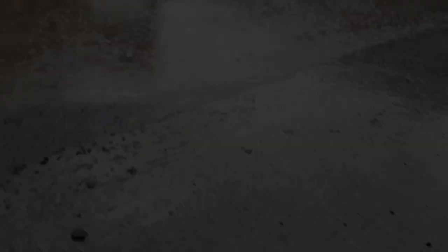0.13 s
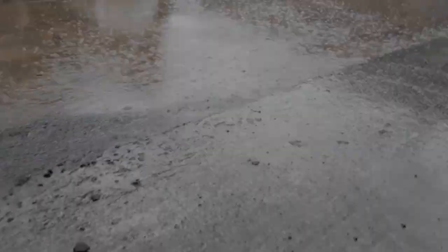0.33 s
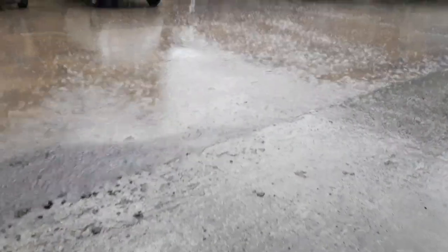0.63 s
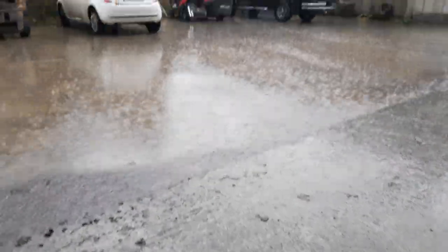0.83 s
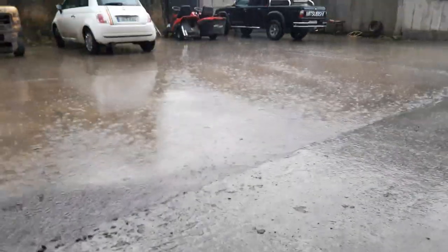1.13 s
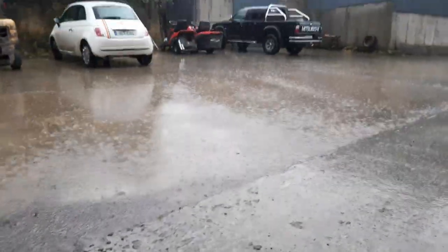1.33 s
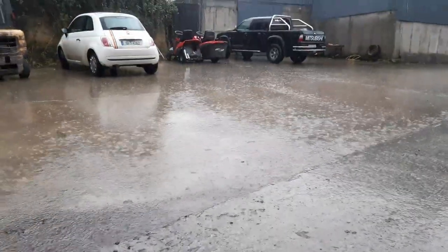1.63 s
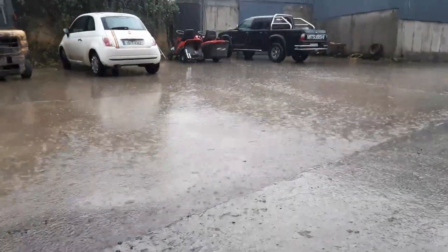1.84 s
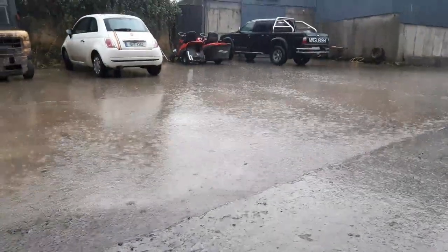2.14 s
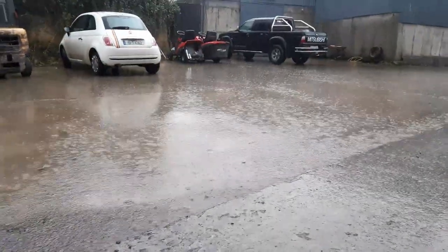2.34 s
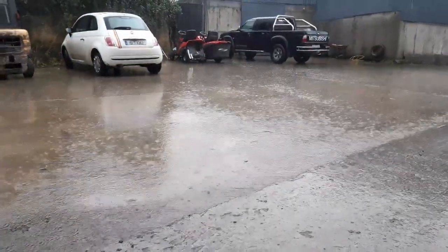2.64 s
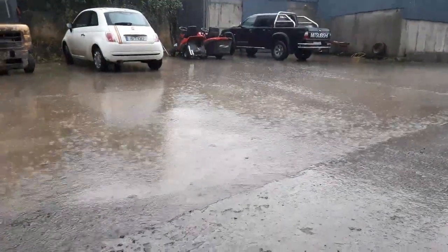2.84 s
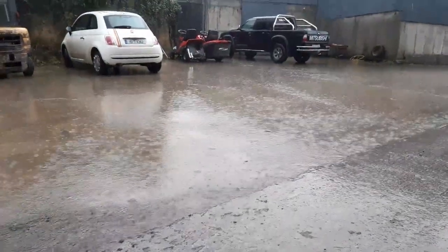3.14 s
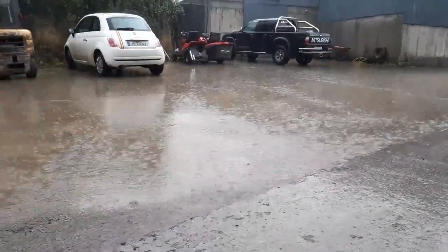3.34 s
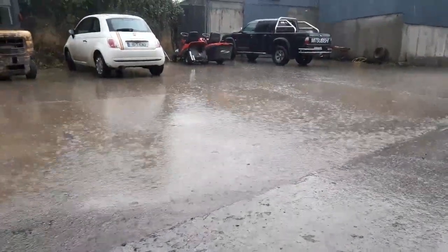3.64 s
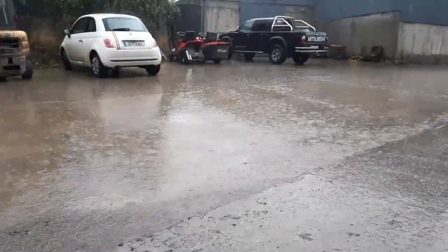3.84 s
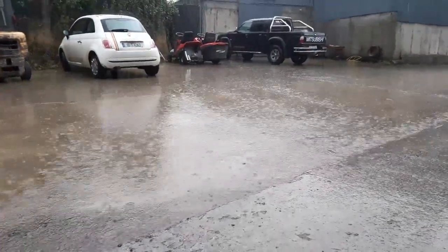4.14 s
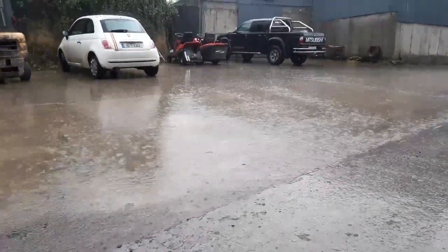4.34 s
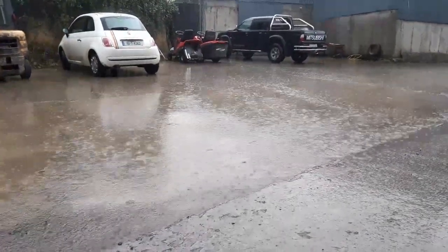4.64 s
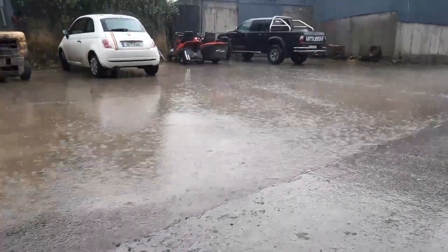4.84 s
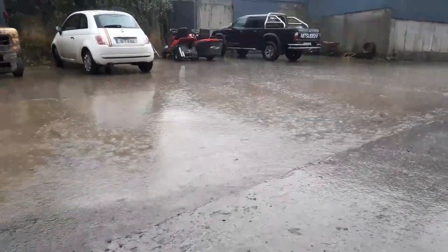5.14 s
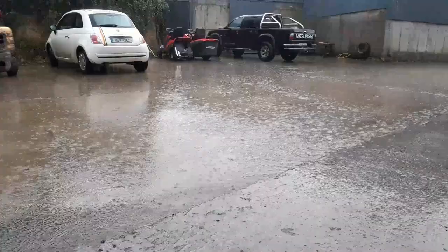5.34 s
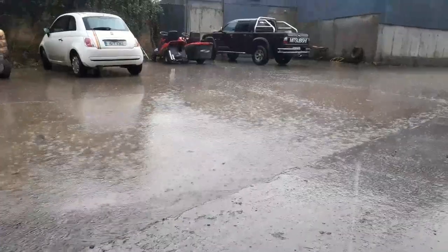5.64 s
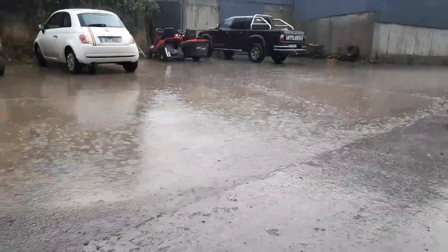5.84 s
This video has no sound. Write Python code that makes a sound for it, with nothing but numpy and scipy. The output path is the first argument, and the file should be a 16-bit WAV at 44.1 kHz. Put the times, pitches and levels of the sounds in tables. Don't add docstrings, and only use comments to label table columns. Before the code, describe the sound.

Steady rain hisses and patters on a puddled concrete yard, with sharp close drop cracks, the loudest just before the fade-out.

```python
import sys
import numpy as np
from scipy import signal
from scipy.fft import rfft, irfft
from scipy.io import wavfile
from scipy.ndimage import uniform_filter1d

SR = 44100
rng = np.random.default_rng(int(sys.argv[2]) if len(sys.argv) > 2 else 0)


def volts_from_db(level):
    exponent = np.asarray(level, float) / 20
    return 10 ** exponent


def persist_wave(psi):
    counts = np.round(np.clip(psi, -1, 1) * 32767).astype(np.int16)
    wavfile.write(sys.argv[1], SR, np.atleast_2d(counts).T)


N = 264644
PORT_RING_HZ = 8500

# time in seconds, level in dB, treble lift in dB.
RAIN_COURSE = [(0.57, -30, 0), (1.2, -32, 0), (2.47, -30.5, -1.5), (5.75, -31.5, -1.5)]
# frequency in Hz, density in dB per Hz.
HISS_SPECTRUM = [(25, -39), (55, -30), (90, -10.5), (130, -10), (200, -10.5), (275, -4.5), (335, -9.5),
                 (650, -4), (810, -4), (920, 0.5), (2200, -3), (2750, -0.5), (4000, -4.5), (6300, -9.5)]
# frequency in Hz, gain in dB.
PORT_RESPONSE = [(7400, 1.5), (8300, 3), (8950, 6.5), (9400, 1), (10200, -9.5), (11800, -7.5), (13000, -12),
                 (15500, -12)]
# low edge in Hz, high edge in Hz, t60 in seconds, gain in dB.
IMPACT_BANDS = [
    (1500, 2800, .008, 1),
    (2400, 4900, .005, 1.6),
    (4600, 7700, .004, 2),
    (7500, 9600, .003, .8),
    (9900, 13300, .003, -7),
    (13300, 17000, .003, -4.5),
]


def evened(x):
    return x / np.sqrt(np.mean(x ** 2) + 1e-20)


def read(points, hz):
    f_hz, value = np.transpose(points)
    return np.interp(np.log(hz + 1), np.log(f_hz + 1), value)


def band(x, lo_hz, hi_hz):
    sos = signal.butter(2, [lo_hz, hi_hz], "band", fs=SR, output="sos")
    return signal.sosfilt(sos, x)


def coloured(x, *spectra):
    hz = abs(np.fft.fftfreq(8192, 1 / SR))
    log_gain = np.log(volts_from_db(sum(read(s, hz) for s in spectra)))
    taps = np.fft.ifft(np.exp(np.conj(signal.hilbert(log_gain)))).real[:4096]
    return signal.oaconvolve(x, taps)[:N]


def fade(t):
    return np.interp(t, (0.048, 0.56, 5.793, 6.24), [0, 1, 1, 0])


def echoed(x):
    # delay in seconds, level in dB.
    echoes = [
        (.0023, -6.5),
        (.0055, -22),
        (0.0232, -11.5),
        (0.029, -15),
    ]
    taps = np.zeros(2048)
    for delay_s, level_db in echoes:
        taps[round(delay_s * SR)] += volts_from_db(level_db - 1.3)
    return x + signal.oaconvolve(x, band(taps, 300, 14000))[:N]


def impact_spray(noise, level_db):
    t = np.arange(len(noise)) / SR
    lumps = volts_from_db(2.2 * evened(uniform_filter1d(noise, size=60)))
    hush = lumps * noise[::-1]
    ring = evened(band(band(hush, 7800, 8700), 8400, 9900))
    wide = volts_from_db(-10) * evened(band(hush, 2600, 14000))
    below_ring = volts_from_db(-6) * evened(band(hush, 6300, 8800))
    envelope = volts_from_db(level_db - 60 * t / .11) * np.minimum(t / .004, 1)
    return envelope * (ring + wide + below_ring)


def drop_impact(noise, parts_db, spray_db):
    t = np.arange(len(noise)) / SR
    out = impact_spray(noise, spray_db)
    for (lo_hz, hi_hz, t60_s, gain_db), peak_db in zip(IMPACT_BANDS, parts_db):
        snap = ((t == 0) + .3 * noise) * volts_from_db(-60 * t / t60_s)
        burst = band(band(snap, lo_hz, hi_hz), lo_hz, hi_hz)
        out = out + volts_from_db(peak_db + gain_db) * burst / abs(burst).max()
    return out


def large_drops():
    # start in seconds, peak in dB, pitch in octaves from the port ring,
    # narrowness in dB per octave squared, spray in dB re the ring.
    cracks = [(0.6822, -16, .35, 6, -22), (0.7998, -13, -0.45, 8, -23), (0.8436, -7, 0.3, 7, -19.5),
              (1.1987, -13.5, 0.86, 7, -26), (1.3507, -12.5, -0.049, 18, -19),
              (1.4341, -14, -0.22, 22, -21), (2.0538, -15, .05, 20, -19), (2.2312, -15, 0.26, 25, -16),
              (3.4293, -18, 0.16, 7, -26), (4.2226, -15.5, -0.32, 17, -18), (4.3473, -10, 1, 13, -25),
              (4.388, -11.5, -0.88, 10, -21), (4.3979, -17, -0.3, 7, -22), (4.6328, -14.5, -0.052, 10, -20),
              (4.882, -10.5, 0.2, 22, -13), (5.7572, -5, 0.17, 23, -11), (5.7704, -19, .2, 10, -11)]
    # start in seconds, peak in dB, pitch in octaves from the ring.
    ticks = [(0.1107, -38, -.2), (0.1237, -34, -0.073), (0.172, -35, .3), (0.504, -25, .8),
             (0.5658, -21, .55), (0.7868, -21, .5), (0.8308, -25, .45), (1.1312, -20.5, 0.49),
             (1.3507, -13.5, -1.3), (1.567, -27, .8), (1.6202, -24, .45), (1.7121, -19.5, 0.16),
             (1.9307, -24, -0.03), (2.066, -25, .8), (2.1026, -21, -.15), (2.9411, -18.5, 0.0045),
             (3.2463, -15.5, 0.51), (3.3456, -20, .55), (3.4891, -18.5, 0.36), (3.7055, -15, 0.36),
             (3.885, -19.5, 0.48), (4.388, -20, .9), (4.6257, -22, -0.4), (4.882, -21, -1.7),
             (5.148, -23, 0.27), (5.4074, -26, 0.41), (5.5395, -21, 0.15), (5.5938, -24, .5),
             (5.699, -27, .7), (5.7565, -11, -1.6)]
    tick_narrow_db, tick_spray_db = 19, -19
    rows = list(cracks) + [(*row, tick_narrow_db, tick_spray_db) for row in ticks]
    out, noise = np.zeros(N + 4096), rng.standard_normal((len(rows), 4096))
    centre_hz = [np.sqrt(lo_hz * hi_hz) for lo_hz, hi_hz, *_ in IMPACT_BANDS]
    octaves = np.log2(np.array(centre_hz) / PORT_RING_HZ)
    for (start_s, peak_db, pitch, narrow_db, spray_db), row in zip(rows, noise):
        at = round(start_s * SR) - 12
        parts_db = peak_db - narrow_db * (octaves - pitch) ** 2
        ring_db = peak_db - narrow_db * pitch ** 2
        out[at:at + len(row)] += drop_impact(row, parts_db, ring_db + spray_db)
    return echoed(out[:N])


def patter(t60_s=0.012):
    # rate in drops per second, level re the hiss in dB, size spread in dB.
    layers = [
        (2490, -10.5, 6),
        (252, -15, -2.5),
    ]
    # frequency in Hz, gain in dB.
    tilt = [(500, -20), (2000, -4), (5000, -7), (9000, -1.5), (14000, 2.5)]
    t, out = np.arange(600) / SR, np.zeros(N)
    for per_s, share_db, spread_db in layers:
        chance, shape = rng.random((2, N))
        size_db = spread_db * np.minimum(rng.exponential(1, N), 3)
        hits = volts_from_db(size_db) * (chance < per_s / SR)
        shape = (shape * 12).astype(int)
        bursts = rng.standard_normal((12, len(t))) * volts_from_db(-60 * t / t60_s)
        layer = sum(signal.oaconvolve(hits * (shape == k), b)[:N] for k, b in enumerate(bursts))
        out += volts_from_db(share_db) * evened(coloured(echoed(layer), HISS_SPECTRUM, PORT_RESPONSE, tilt))
    return out


def hiss(patchy_db=0.22, flicker_db=-0.22):
    frames, hz = N // 512 + 5, np.fft.rfftfreq(2048, 1 / SR)
    a, b, patches = rng.standard_normal((frames, 1025, 3)).T
    flicker = evened(uniform_filter1d(patches[0], size=3))
    patches = uniform_filter1d(patches, size=28, axis=0)
    patches = evened(uniform_filter1d(patches, size=7, axis=1))
    time_s, _, lift_db = np.transpose(RAIN_COURSE)
    treble = np.clip(np.log2(hz / 2500 + 1e-9), 0, 2)[:, None] / 2
    lift = np.interp(np.arange(frames) * 512 / SR, time_s, lift_db) * treble
    colour = (read(HISS_SPECTRUM, hz) + read(PORT_RESPONSE, hz))[:, None]
    z = (a + 1j * b) * volts_from_db(colour + patchy_db * patches + flicker_db * flicker + lift)
    return evened(signal.istft(z, nperseg=2048, noverlap=1536)[1][:N])


def side_noise():
    # time in seconds, centre in Hz.
    patches = [(0.232, 5470), (0.232, 9100), (1.393, 14450), (2.81, 8330), (2.902, 4920), (3.529, 4850),
               (3.785, 6300), (3.785, 12300), (5.271, 5760), (5.503, 7560), (5.828, 8560), (5.921, 4730),
               (5.921, 10770)]
    width_hz, level_db = 1270, -36.5
    out, hz = np.zeros(N + 2048), np.fft.rfftfreq(2048, 1 / SR)
    for (time_s, centre_hz), row in zip(patches, rng.standard_normal((len(patches), 2048))):
        at = round(time_s * SR) - 1024
        noise = evened(irfft(rfft(row) * (abs(hz - centre_hz) < width_hz / 2)))
        colour_db = read(HISS_SPECTRUM, centre_hz) + read(PORT_RESPONSE, centre_hz)
        gain = fade(time_s) * volts_from_db(level_db + colour_db)
        out[at:at + 2048] += gain * noise * np.sqrt(signal.windows.hann(2048))
    return out[:N] * [[1], [-1]]


def ducked(x):
    # time in seconds, length in seconds, gain in dB.
    ducks = [
        (4.8803, .0025, -5),
        (5.7541, .0052, -14),
    ]
    t = np.arange(N) / SR
    gain_db = sum(db * np.exp(-((t - s) / length_s * 2) ** 4) for s, length_s, db in ducks)
    return x * volts_from_db(gain_db)


def thinned(x):
    # time in seconds, threshold in dB re the rms line, share lost from 0 to 1,
    # frequency in Hz under which the bass is lost.
    gaps = [(.271, 3, .85, 520), (.279, 2, 1, 520), (.288, 1, .8, 520), (.338, 4, .8, 30),
            (1.987, 4, .75, 30), (2.174, 3, .75, 30)]
    out, window, hz = x.copy(), np.sqrt(signal.windows.hann(2048)), np.fft.rfftfreq(2048, 1 / SR)
    for time_s, threshold_db, share, bass_hz in gaps:
        at = round(time_s * SR) - 1024
        lines = rfft(out[at:at + 2048] * window)
        threshold = volts_from_db(threshold_db) * np.sqrt(np.mean(abs(lines) ** 2))
        lost = ((abs(lines) < threshold) & (hz > 3500)) | (hz < bass_hz)
        out[at:at + 2048] -= share * irfft(lines * lost) * window
    return out


def low_passed(x, edge_hz):
    return signal.oaconvolve(x, signal.firwin(511, edge_hz, window=("kaiser", 7), fs=SR), "same")


def band_limited(x, edge_hz=15850, crack_edge_hz=16600):
    kept = low_passed(x, edge_hz)
    top = low_passed(x, crack_edge_hz) - kept
    crack = uniform_filter1d(abs(top), size=128) > volts_from_db(-47)
    gate = uniform_filter1d(uniform_filter1d(1. * crack, size=128), size=128)
    return kept + volts_from_db(-4) * top * gate


def scene():
    t, (time_s, level_db, _) = np.arange(N) / SR, np.transpose(RAIN_COURSE)
    level = fade(t) * volts_from_db(np.interp(t, time_s, level_db) + 2.5)
    return np.tile(level * (hiss() + patter()) + large_drops(), (2, 1))


def roll_off(x):
    return signal.sosfilt(signal.butter(12, 16970, fs=SR, output="sos"), x)


def record(dry):
    start_s = .0695
    mono = band_limited(thinned(ducked(dry[0])))
    mix = mono * (np.arange(N) > start_s * SR) + side_noise()
    return roll_off(mix)


dry = scene()
out = record(dry)
persist_wave(out)
```